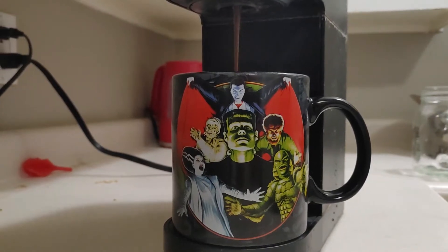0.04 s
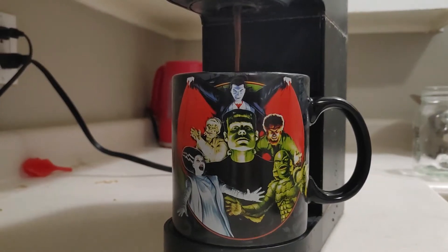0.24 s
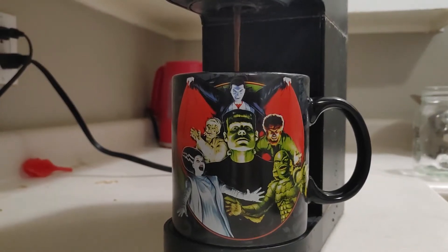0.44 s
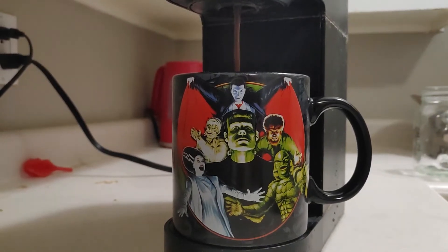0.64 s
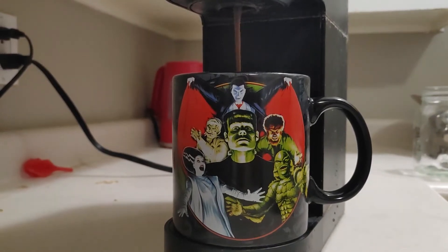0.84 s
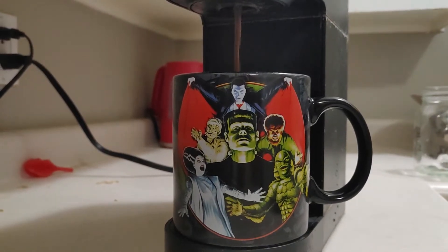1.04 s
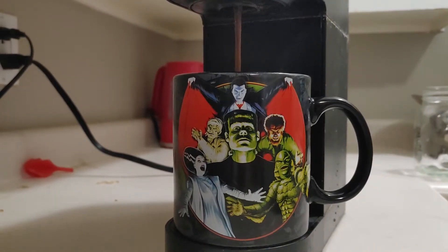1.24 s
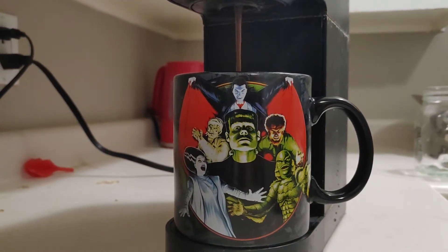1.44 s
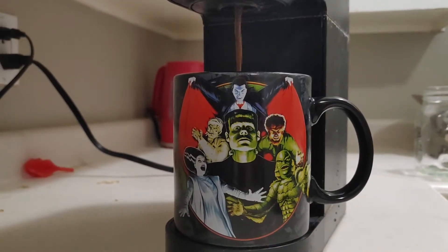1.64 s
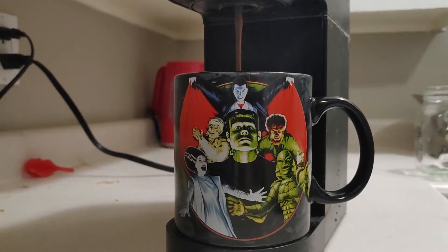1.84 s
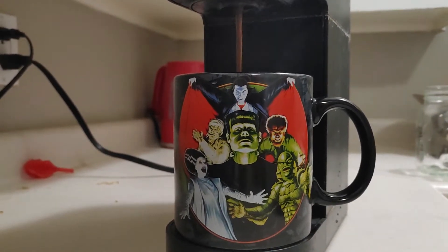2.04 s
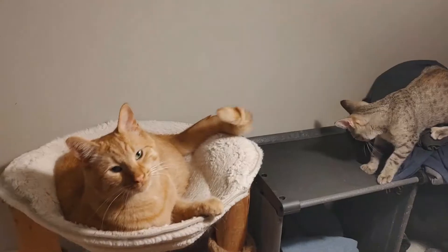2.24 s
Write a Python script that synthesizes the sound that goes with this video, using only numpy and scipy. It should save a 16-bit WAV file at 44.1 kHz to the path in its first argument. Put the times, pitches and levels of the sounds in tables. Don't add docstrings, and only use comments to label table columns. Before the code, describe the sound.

Coffee pours steadily into a ceramic mug from 0 to 2.15 seconds, a patchy bright hiss with dense fizz and irregular spitting droplets ringing high in the mug. Beneath it a small pump hums and rattles its plastic housing, over low kitchen air. A big bubble plops at 1.35; a finger taps the phone at 2.1, then an abrupt cut to silence. Close stereo, short room reverberation.

```python
import sys
import numpy as np
from scipy import signal
from scipy.fft import rfft, irfft, next_fast_len
from scipy.io import wavfile
from scipy.ndimage import uniform_filter1d, map_coordinates

SR = 44100
rng = np.random.default_rng(int(sys.argv[2]) if len(sys.argv) > 2 else 0)


def unload_audio(sound):
    columns = np.transpose(np.atleast_2d(sound))
    steps = np.round(np.clip(columns, -1, 1) * 32767)
    wavfile.write(sys.argv[1], SR, steps.astype(np.int16))


def boost_factor(decibels):
    exponent = np.asarray(decibels, float) / 20
    return 10 ** exponent


N = 101253


def unit(x):
    return x / np.sqrt(np.mean(x ** 2) + 1e-20)


def along(points, hz):
    f, v = np.transpose(points)
    return np.interp(np.log(hz + 1), np.log(f + 1), v)


def curve(rows):
    start_s, value = np.transpose(rows)[[0, -1]]
    return np.interp(np.arange(N) / SR, start_s, value)


def wobble(rate_hz):
    knots = rng.standard_normal(int(N * rate_hz / SR) + 4)
    return map_coordinates(knots, [np.arange(N) * rate_hz / SR])


def filtered(x, response):
    m = next_fast_len(N + SR // 2)
    return irfft(rfft(x, m) * response(np.fft.rfftfreq(m, 1 / SR)), m)[..., :N]


def resonances(modes):
    def response(f):
        total = 0
        for k, (c, w, db) in enumerate(modes):
            total = total + (-1) ** k * boost_factor(db) * 1j * f * w / (c * c - f * f + 1j * f * w)
        return total
    return response


# freq_hz, common_share
LIKENESS = [(200, 0.88), (600, 0.85), (1500, .2), (10000, 0.14)]


def pair():
    def split(hz):
        turn = np.arccos(np.clip(along(LIKENESS, hz), -1, 1)) / 2
        return np.array([np.cos(turn), np.sin(turn)])
    a, b = filtered(rng.standard_normal((2, N)), split)
    return np.array([a + b, a - b])


# freq_hz, t60_s
ROOM_T60 = [(300, 0.05), (1000, 0.22), (3000, 0.16), (10000, 0.37)]


def room(x):
    _, t, z = signal.stft(rng.standard_normal((2, SR // 3)), SR, nperseg=256)
    hz = _
    decay = boost_factor(-60 * t / along(ROOM_T60, hz)[:, None])
    tail = signal.istft(z * decay, SR, nperseg=256)[1]
    return signal.fftconvolve(x[None], tail / np.linalg.norm(tail[0]), axes=1)[:, :N]


def bubbles(start_s, hz, size, cycles):
    t = np.arange(400) / SR
    age = t * hz[:, None] / cycles
    envelope = np.exp(-age) * (1 - np.exp(-4 * age))
    wave = size[:, None] * np.sin(2 * np.pi * hz[:, None] * t * (1 + 0.011 * age)) * envelope
    at = (start_s * SR).astype(int)[:, None] + np.arange(len(t))
    return np.bincount(at.ravel(), wave.ravel(), N + SR)[:N]


PUMP_HZ = 53.68
STEADY_DB, RATTLE_DB = -52, 5
RATTLE_DEPTH = 0.42
# stroke_multiple, level_db
PUMP_ORDERS = [(1, -48.5), (2, -40), (3, -22.5), (4, -12), (5, -23.5), (6, -26), (7, -34), (8, -20),
               (9, -2.5), (10, -9), (11, -9.5), (12, -7)]
# start_s, pitch_hz, level_db
HUM_LEVEL = [(0.0, 488.9, -50), (0.07, 483.3, -49), (0.4, 482.9, -55), (0.42, 482.5, -84),
             (0.47, 482.6, -50), (1.12, 482.0, -51), (1.26, 486.7, -75), (1.29, 486.2, -51),
             (1.37, 483.7, -53.5), (1.44, 484.2, -53), (1.81, 482.9, -56), (2.08, 482.7, -48.5)]
# freq_hz, width_hz, level_db
HOUSING_MODES = [(486, 105, -2.5), (648, 98, -2), (681, 29.2, 3.5), (901.7, 52, -3), (1358, 92, -10),
                 (1547, 46, -9), (1708, 53, -8)]
# start_s, level_db
RATTLE_LEVEL = [(0.0, -55), (.1, -56), (.25, -54), (.47, -55.5), (.57, -52.5), (.7, -55), (.93, -56),
                (1.2, -56), (1.4, -54.5), (1.58, -56), (1.75, -54.5), (1.93, -54.5), (2.05, -53.5),
                (2.14, -52)]


def pump():
    turn = 2 * np.pi * PUMP_HZ * np.arange(N) / SR + 0.031 * wobble(2.2)
    tones = 0
    for k, db in PUMP_ORDERS:
        if k == 9:
            level = boost_factor(curve(HUM_LEVEL))
        else:
            level = boost_factor(STEADY_DB + db + k * k / 30 * wobble(14))
        tones = tones + level * np.sqrt(2) * np.sin(k * turn + rng.uniform(0, 2 * np.pi))

    gate = (1 + RATTLE_DEPTH * np.cos(turn)) * boost_factor(wobble(40.67))
    shake = gate * pair()
    shake = shake + boost_factor(0.5) * room(shake[0])
    body = resonances(HOUSING_MODES)
    rattle = unit(filtered(shake, lambda f: body(f) / (1 + (420 / (f + 1)) ** 6)))
    return tones + boost_factor(RATTLE_DB + curve(RATTLE_LEVEL)) * rattle


FIZZ_DB, HISS_DB = -6.5, 3
MUG_RING_DB = 8
# start_s, level_db
FLOW_LEVEL = [(0.0, -51), (0.52, -52.5), (0.91, -50.5), (1.1, -52), (1.29, -50), (1.43, -52), (2.0, -51.5)]
# freq_hz, level_db (per Hz)
STREAM_SPECTRUM = [(2000, 1), (2250, -2.5), (2600, -1), (2900, 2.5), (3500, 4.5), (5200, 4), (6100, -3.5),
                   (11700, -2.5), (12900, -8.5)]
# freq_hz, width_hz, level_db
MUG_MODES = [(2534, 220, -4.5), (3440, 130, -12.5), (3850, 40, -2.5), (4250, 120, -5.5), (5160, 410, -6),
             (6630, 310, 1), (7380, 86, 7.5), (7940, 53, 3), (11500, 100, -18), (11700, 600, -11.5)]


def stream():
    z = signal.stft(pair(), nperseg=256)[2]
    patches = uniform_filter1d(rng.standard_normal(z.shape[1:]), 4, 0)
    patches = unit(uniform_filter1d(patches, 9, 1))
    noise = signal.istft(z * boost_factor(3.3 * patches), nperseg=256)[1][:, :N]

    def colour(f):
        ring = 1 + boost_factor(MUG_RING_DB) * abs(resonances(MUG_MODES)(f))
        return boost_factor(along(STREAM_SPECTRUM, f)) * (f > 1800) * ring
    hiss = filtered(noise, colour)
    hiss = hiss + boost_factor(-1.0) * room(hiss[0])

    start, pick, offset, rarity = rng.random((4, 1500))
    c, w, db = np.transpose(MUG_MODES)[:, (pick * len(MUG_MODES)).astype(int)]
    size = boost_factor(db - 2.6 * np.log(rarity + .03))
    fizz = bubbles(start * N / SR, c + w * (offset - .5), size, cycles=14)
    fizz = fizz + boost_factor(2.5) * room(fizz)
    flow = boost_factor(curve(FLOW_LEVEL) + 0.45 * wobble(27))
    return flow * (boost_factor(HISS_DB) * unit(hiss) + boost_factor(FIZZ_DB) * unit(fizz))


AIR_DB = -64
# freq_hz, level_db (per Hz)
AIR_SPECTRUM = [(25, -25.5), (100, -5), (160, -3), (350, -1.5), (1500, -13), (2100, -14), (12500, -54),
                (16000, -46.5)]


def kitchen_air():
    return boost_factor(AIR_DB) * unit(filtered(pair(), lambda f: boost_factor(along(AIR_SPECTRUM, f))))


PITCH_SCATTER, SPRAY_S, BUBBLE_CYCLES = .045, .006, 7
DROP_DB = -3
# start_s, peak_db, pitch_hz, t60_s, spray_db (over the bubbles)
SPIT_EVENTS = [(0.172, -43, 4820, 0.23, 2), (0.266, -35, 7280, 0.32, 5.5), (0.4089, -34, 7900, 0.087, 9.5),
               (0.4437, -32.5, 11700, 0.041, -18), (0.5666, -29.5, 5180, 0.081, 1),
               (.6290, -30, 7200, .1, -7.5), (0.629, -47, 3390, .04, -32), (0.647, -35, 6950, .08, -3),
               (0.694, -40.5, 2454, .1, -24.5), (0.7668, -41, 7870, 0.051, 13),
               (0.9129, -34, 6970, 0.24, 3.5), (1.1138, -33.5, 7100, 0.19, -25),
               (1.1928, -37.5, 7320, 0.22, -4), (1.2394, -33.5, 7380, .3, -0.5),
               (1.428, -35.5, 7370, 0.093, 0.5), (1.614, -34.5, 5200, 0.055, -16),
               (1.6337, -38, 5270, 0.054, -10), (1.691, -37, 11700, 0.24, 2),
               (1.7392, -38.5, 7120, 0.087, 3), (2.044, -22.5, 7220, 0.089, -23),
               (2.1383, -30, 6850, .05, 3.5), (2.141, -34, 11000, .04, -26)]
# start_s, peak_db, pitch_hz
DROP_EVENTS = [(0.1892, -28.5, 11700), (.2994, -24, 7150), (.4544, -31, 7380), (.61, -29, 5200),
               (0.6523, -36, 7000), (.698, -52, 2417), (0.715, -44, 2455), (.733, -48, 2470),
               (.745, -55, 2440), (0.9302, -22, 7380), (.93, -33, 3510), (0.574, -30.5, 5110),
               (1.4344, -42, 7240), (1.6374, -44, 5300), (1.6764, -28.5, 7380), (1.6894, -34, 11100),
               (1.7394, -39.5, 7000), (1.9194, -41, 4200), (2.0644, -35, 8020), (2.08, -41.5, 11100)]


def spits():
    spray = np.zeros(N + SR)
    t = np.arange(SR // 4) / SR
    puff = np.exp(-t / SPRAY_S) * (1 - np.exp(-t / 0.00084))
    start_s, db, hz = np.transpose(DROP_EVENTS)
    ring = bubbles(start_s, hz, boost_factor(db + DROP_DB), cycles=9)
    later = np.arange(16) > 0
    for start_s, db, hz, t60_s, spray_db in SPIT_EVENTS:
        late, offset = rng.random(len(later)), rng.standard_normal(len(later))
        delay_s = -np.log(1 - late * .99) * t60_s / 10 * later
        size = boost_factor(db + 3 - 60 * delay_s / t60_s) * np.where(later, .7, 1)
        pitch_hz = hz * (1 + PITCH_SCATTER * offset * later)
        ring += bubbles(start_s + delay_s, pitch_hz, size, BUBBLE_CYCLES)
        noise = rng.standard_normal(len(t))
        spray[round(start_s * SR):][:len(t)] += boost_factor(db + spray_db) * puff * noise

    def colour(f):
        band = (1 + (5000 / (f + 1)) ** 4) * (1 + (f / 13500) ** 10)
        return boost_factor(0.52 * along(STREAM_SPECTRUM, f)) / band
    return ring + filtered(spray[:N], colour)


PLOP_S, PLOP_DB, PLOP_HOLD_S = 1.354, -30, .005
# pitch_hz, level_db, t60_s
PLOP_MODES = [
    (694, -1, .03),
    (990, 0, .035),
    (1110, -5, .03),
]


def plop():
    t = np.clip(np.arange(N) / SR - PLOP_S, 0, None)
    late = np.clip(t - PLOP_HOLD_S, 0, None)
    attack = 1 - np.exp(-t / .0012)
    out = 0
    for hz, db, t60_s in PLOP_MODES:
        out = out + boost_factor(PLOP_DB + db - 60 * late / t60_s) * np.sin(2 * np.pi * hz * t) * attack
    return out


TAP_S, TAP_DB = 2.0963, -22
# freq_hz, level_db, decay_s
TAP_MODES = [
    (2300, 1, .0005),
    (440, -3, .0022),
]


def tap():
    t = np.clip(np.arange(N) / SR - TAP_S, 0, None)
    push = 0
    for hz, db, decay_s in TAP_MODES:
        push = push + boost_factor(TAP_DB + db) * np.sin(2 * np.pi * hz * t) * np.exp(-t / decay_s)
    push = filtered(push, lambda f: 1 / (1 + (110 / (f + 1)) ** 2) / (1 + (f / 4500) ** 4))
    return np.array([boost_factor(-11) * np.roll(push, -95), push])


LAG_S = .004
WET_DB, PLOP_WET_DB = -2, -3
# freq_hz, left_over_right_db
STEREO_LEAN = [(60, -7.5), (110, 6.5), (200, 6.5), (380, 0), (700, 8), (1290, 5), (2380, -1.5), (4400, 4),
               (8120, -5), (15000, -1)]


def scene():
    steady = pump() + stream() + kitchen_air()
    hits, big = spits(), plop()
    splashes = hits + boost_factor(WET_DB) * room(hits)
    plopping = big + boost_factor(PLOP_WET_DB) * room(big)

    def ears(f):
        lean = boost_factor(along(STEREO_LEAN, f) * [[.5], [-.5]])
        return lean * np.exp(-2j * np.pi * f * [[0], [LAG_S]])
    return filtered(steady + splashes + plopping, ears) + tap()


def top_cut(x):
    return signal.sosfilt(signal.butter(12, 15500, fs=SR, output="sos"), x)


CUT_S, FADE_S = 2.1545, .003
# freq_hz, level_db
TREBLE_RESPONSE = [(8500, 0), (9300, -8), (9900, -8), (10600, 0), (12500, 0), (13100, -12), (15500, -10),
                   (16300, -40)]


def record(dry):
    heard = filtered(dry, lambda f: boost_factor(along(TREBLE_RESPONSE, f)))
    fade = np.clip((CUT_S - np.arange(N) / SR) / FADE_S, 0, 1) ** 3
    return top_cut(heard * fade)


dry = scene()
out = record(dry)
unload_audio(out)
```